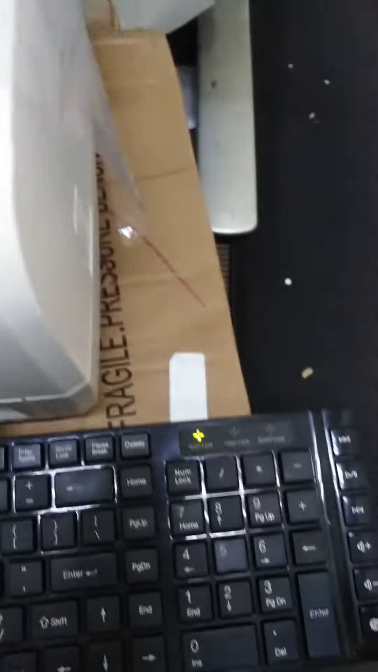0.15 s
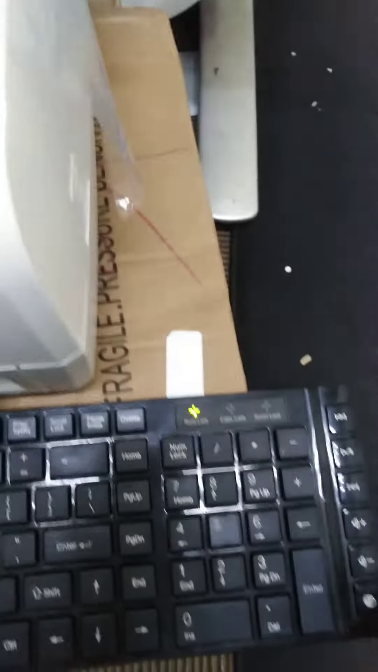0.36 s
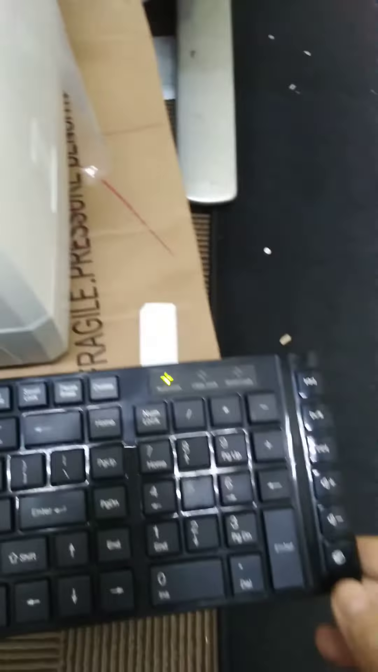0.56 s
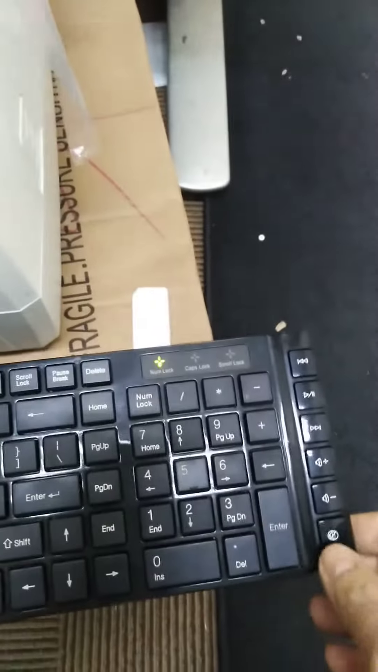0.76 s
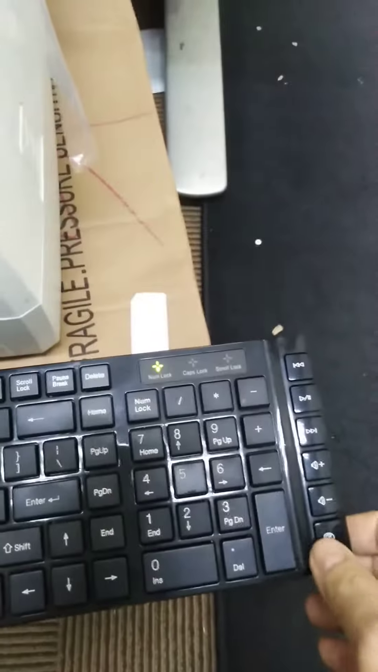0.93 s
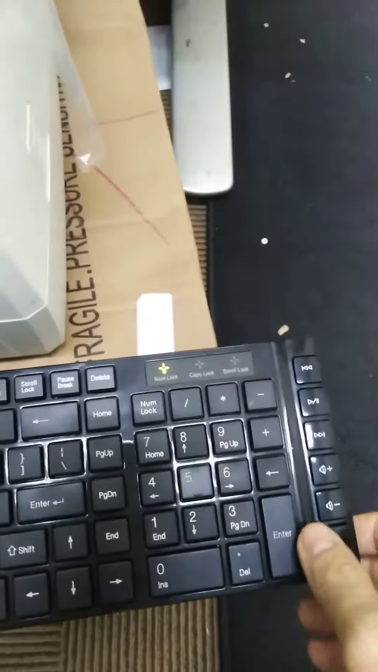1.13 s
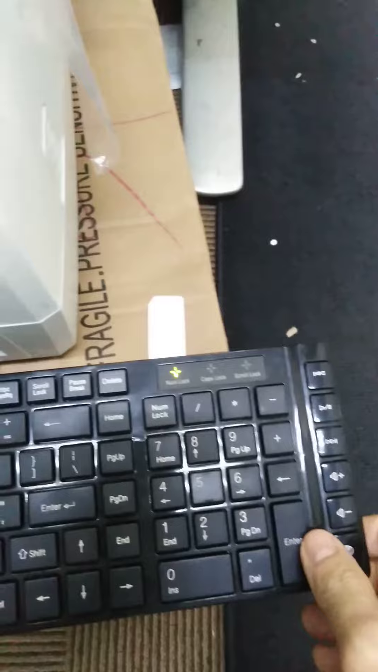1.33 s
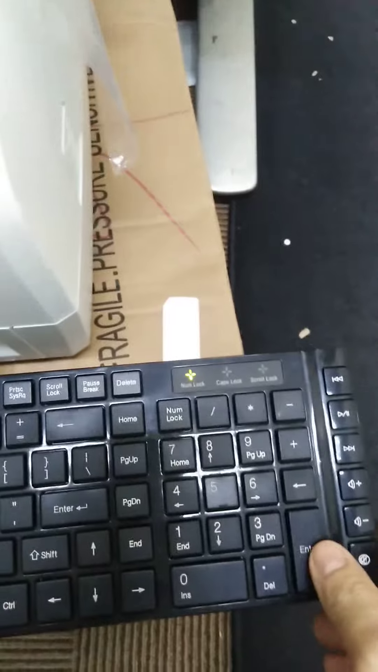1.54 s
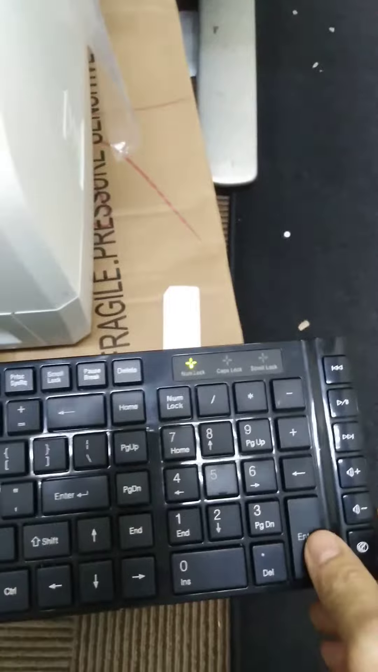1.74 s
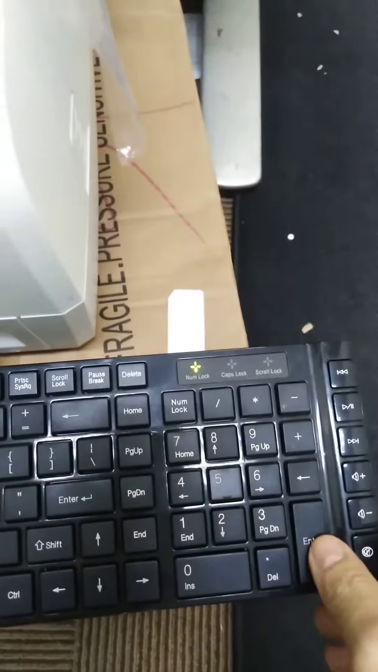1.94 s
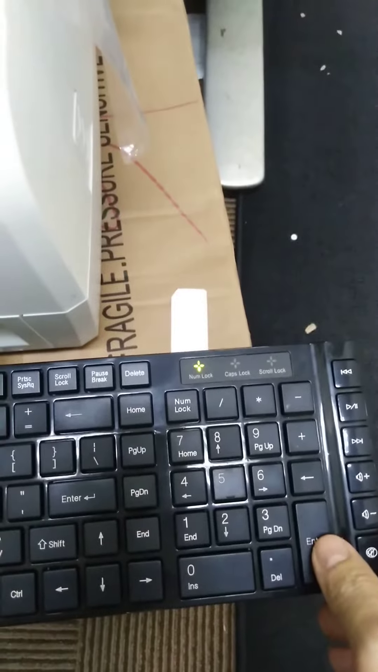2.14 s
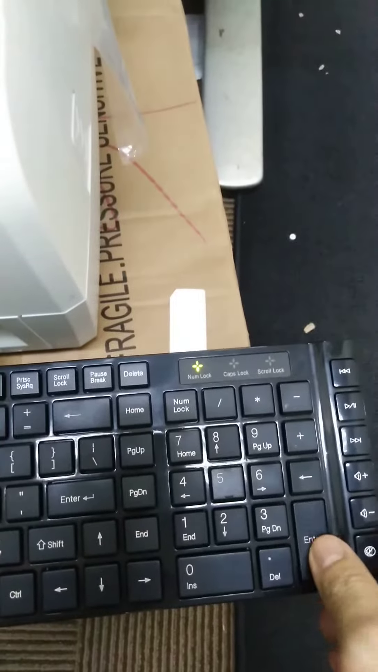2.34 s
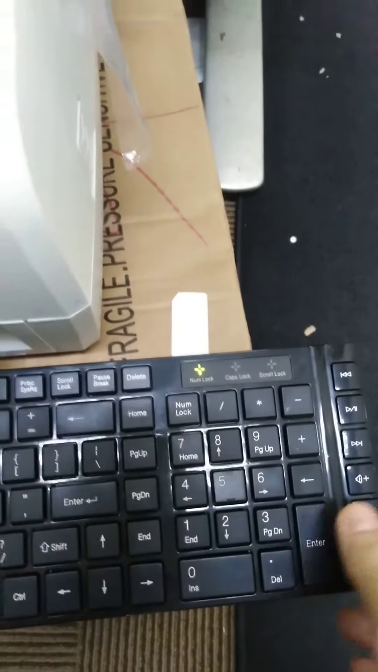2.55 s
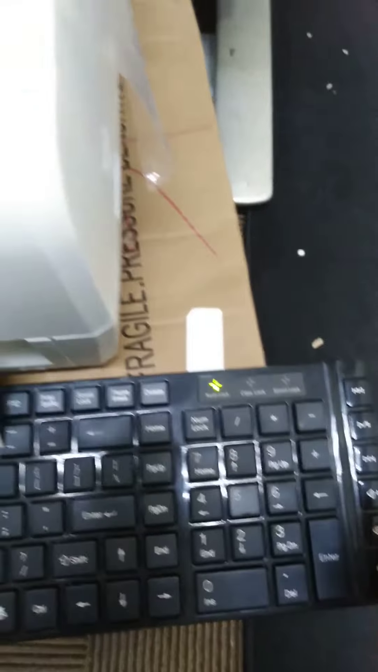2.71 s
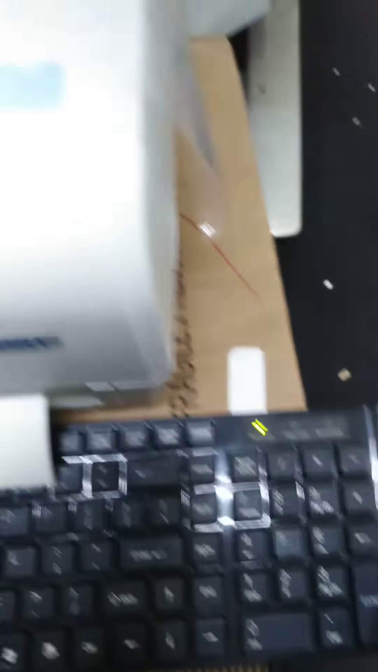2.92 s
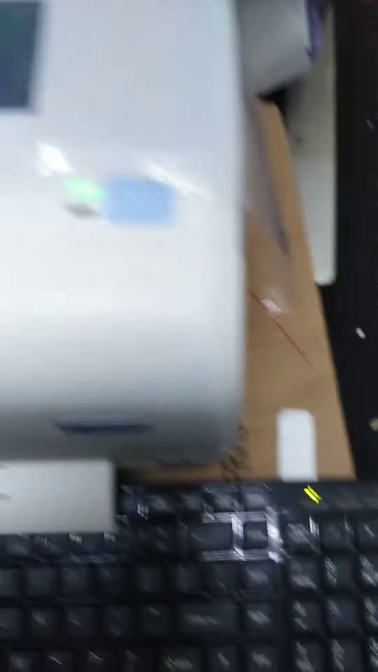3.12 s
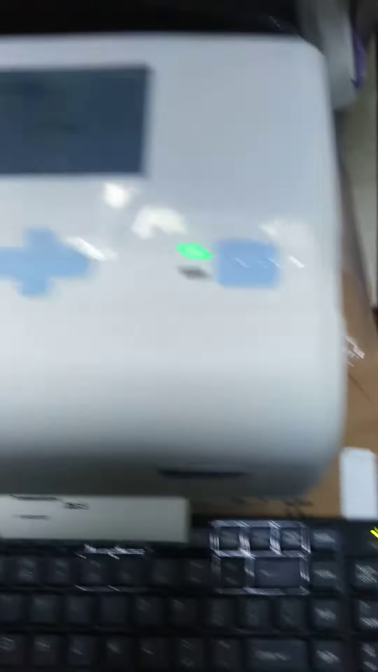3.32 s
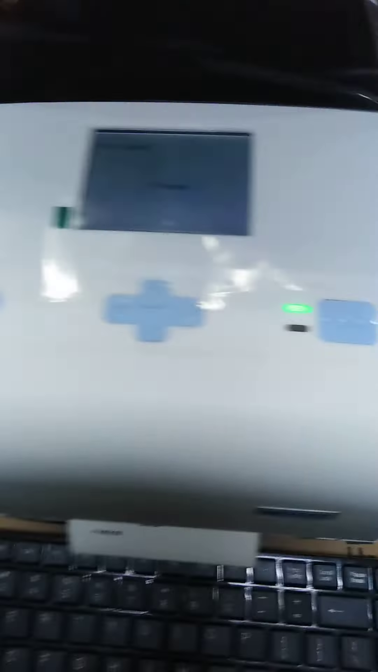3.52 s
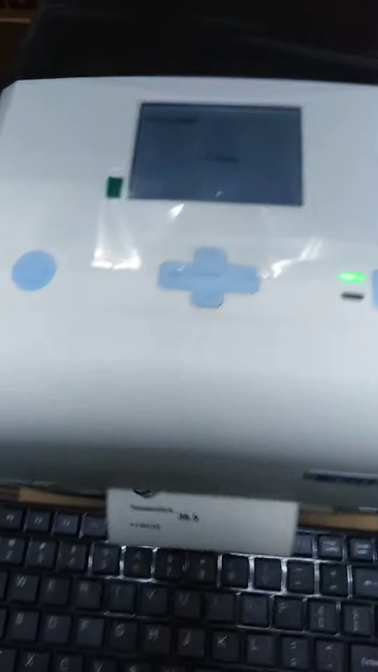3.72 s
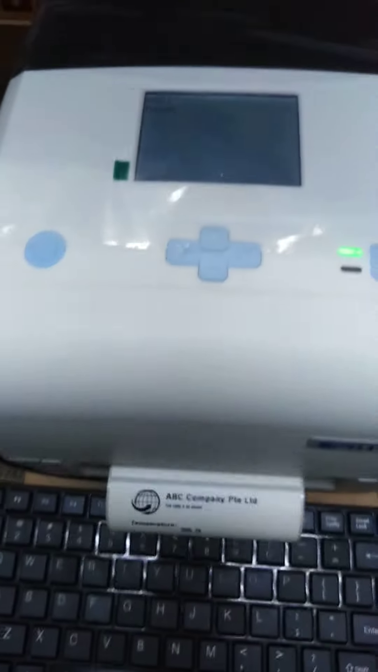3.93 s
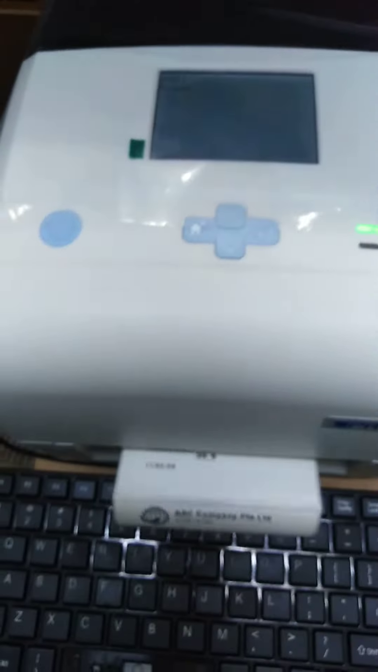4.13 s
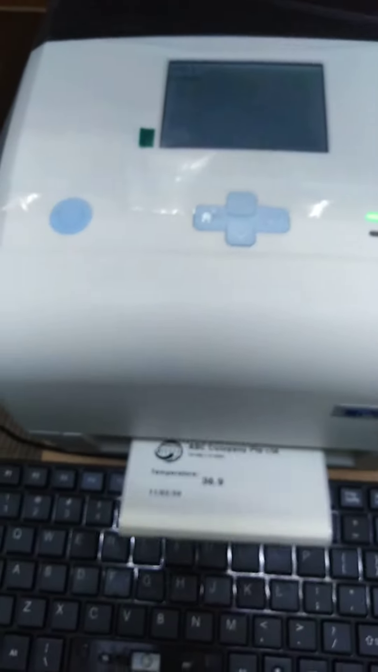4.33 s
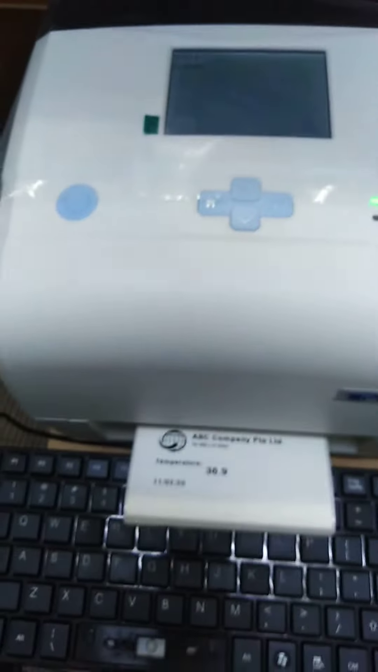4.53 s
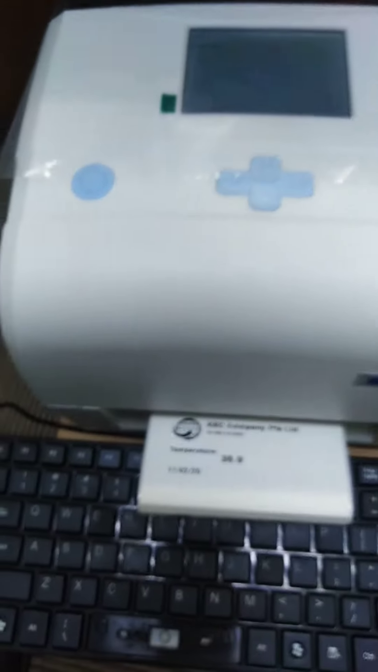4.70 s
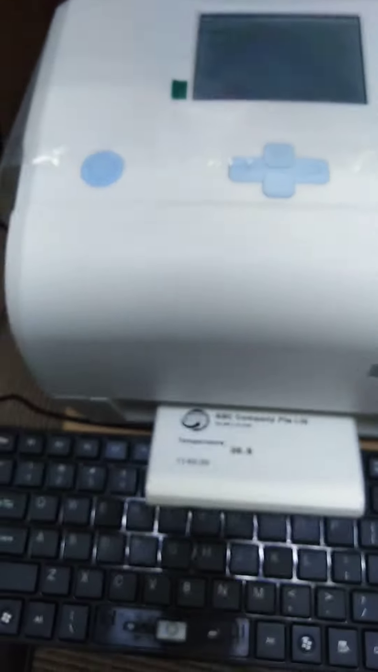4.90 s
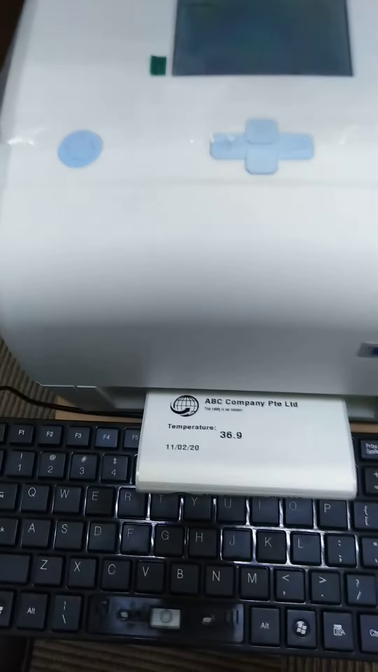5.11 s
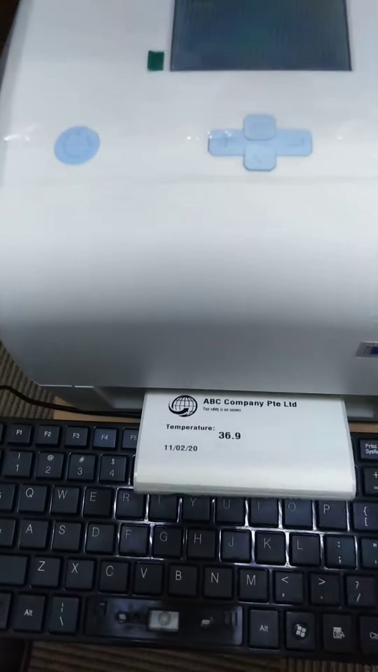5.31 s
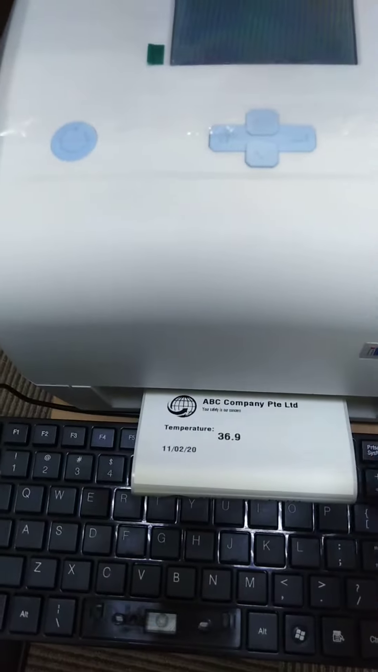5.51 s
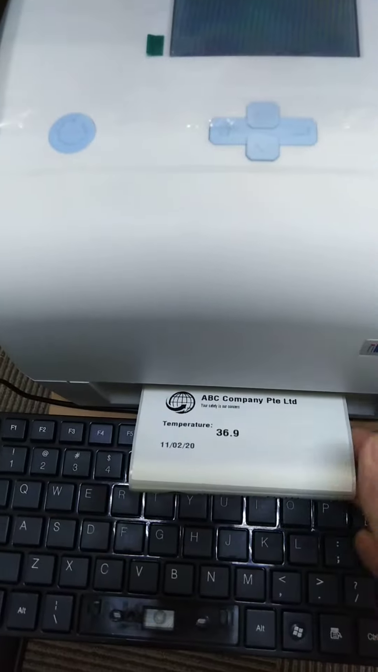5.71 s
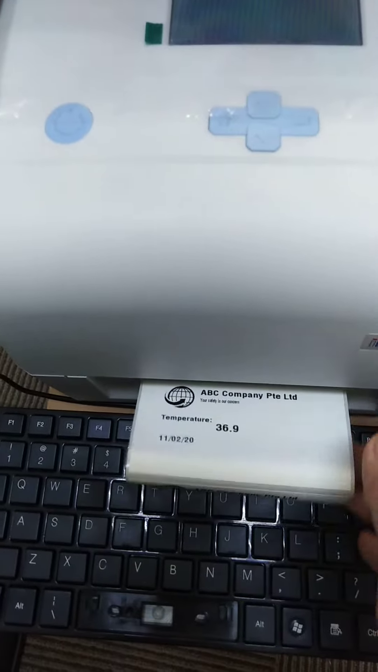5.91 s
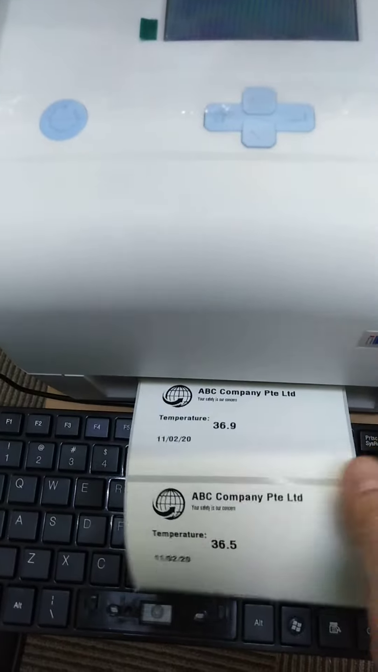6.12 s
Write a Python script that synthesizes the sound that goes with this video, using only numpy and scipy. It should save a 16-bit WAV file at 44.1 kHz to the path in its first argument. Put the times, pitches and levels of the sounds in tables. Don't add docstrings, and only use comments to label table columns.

```python
import sys
import numpy as np
from scipy import signal
from scipy.fft import rfft, irfft, next_fast_len
from scipy.io import wavfile
from scipy.ndimage import uniform_filter1d, minimum_filter1d

SR = 44100
rng = np.random.default_rng(int(sys.argv[2]) if len(sys.argv) > 2 else 0)


def transcribe(signal):
    frames = np.atleast_2d(signal).T
    limited = np.clip(frames, -1, 1)
    pcm = np.round(limited * 32767).astype(np.int16)
    wavfile.write(sys.argv[1], SR, pcm)


def voltage_ratio(decibels):
    exponent = np.asarray(decibels, float) / 20
    return 10 ** exponent


N = 271567

# (frequency [Hz], density [dB])
HUM = [(24, -36), (40, -7), (92, 0), (118, -10.5), (149, -8), (211, -18.5), (246, -13.5), (287, -22.5),
       (325, -13), (348, -19), (389, -19.5), (649, -24), (1100, -42.5), (1430, -76), (2420, -120)]
# (frequency [Hz], width [Hz], gain [dB])
FANS = [(92, 4.2, -9), (146, 10, -20), (69.5, 15, -1.5)]
# (frequency [Hz], density [dB])
HISS = [(600, -36), (900, 5.5), (1300, -3.5), (2400, -2.5), (4000, -6.5), (6500, -1.5), (9000, -7.5),
        (12500, -9.5), (14300, -45)]
# (time [s], level [dB])
HISS_DB = [(0, -70.5), (.45, -77.5), (.65, -70), (.9, -78.5), (1.1, -70.5), (1.3, -83.5), (1.9, -81.5),
           (2.3, -73.5), (2.75, -76.5), (2.95, -68), (4.68, -67.5), (4.76, -78), (4.85, -74), (5.0, -77),
           (5.7, -77), (5.75, -63)]
# (frequency [Hz], left-right correlation [-1 to 1])
SAME = [(60, 0.96), (180, 0.95), (550, 0.67), (1650, -0.68), (4970, 0.01), (15000, -0.01)]
# (time [s], share turned [0-1])
FACING = [(1.3, 0.01), (1.9, 0.38), (2.95, .4), (4.7, 0.96), (6.16, .7)]
# (facing the keys, facing the printer) [dB], [dB], [Hz]
BASS_DB = (-44.5, -48.5)
WASH_DB = (-48.5, -47.5)
EDGE_HZ = (797, 1180)
# (frequency [Hz], gain [dB])
OVERALL_TONE = [(25, -20.5), (45, -11.5), (60, 1.3), (14200, 4), (14600, -31), (16300, -36), (16600, -82)]
# (frequency [Hz], left over right [dB])
LEAN = [(60, -5), (130, 5), (290, -3), (640, 1), (1410, -1.5), (3100, -0.5), (6820, 6), (15000, -13)]
# (frequency [Hz], left leads [radians])
TURN = [(0, 1), (300, 0.2), (1000, 0.73), (2300, 1), (4800, 1.26), (9000, -2.5), (15000, -1.5)]
# (frequency [Hz], left over right [dB])
SNAP_LEAN = [(60, 22), (150, -20), (380, 14), (950, -10.5), (2380, 12), (5980, 7), (15000, -29)]
# (frequency [Hz], left leads [radians])
SNAP_TURN = [(0, 5), (2070, -2.4), (4220, 16), (8790, 7.5), (11400, 6.5), (14500, -3), (16100, 7)]

# (time [s], peak [dB], ring [Hz], t60 [s]) faint thin rings flicker about the edge of the
FLICKERS = [(.04, -66, 2230, .15), (.33, -63, 1120, 0.16), (.42, -66, 2190, 0.32), (.68, -61, 1003, 0.13),
            (1.04, -60.5, 1010, 0.13), (1.17, -65, 1320, .12), (1.85, -66, 1030, .1),
            (2.09, -66, 1300, 0.091), (2.33, -62, 1150, .08), (2.74, -62.5, 1050, .15),
            (2.91, -63, 1420, .12), (2.89, -60, 914, 0.17)]
RINGS = [(1.098, -58.5, 1830, 0.04), (1.098, -58, 2420, 0.078), (1.098, -58, 5130, 0.08),
         (1.296, -60, 1420, 0.086), (1.296, -60, 1843, 0.14), (1.296, -58.5, 2860, 0.099),
         (1.89, -62, 1275, 0.6), (2.328, -59.5, 1960, 0.13), (3.87, -38.5, 838, 0.043),
         (4.05, -40, 812, 0.1), (4.088, -32.5, 804, 0.17)]
NAIL = [(1.46, -56, 7100, .12), (1.46, -58, 9700, .1), (1.46, -60, 8300, .03), (1.461, -62, 4650, .05),
        (1.461, -66, 4100, .05), (1.46, -63, 12000, .03), (1.448, -70, 10000, .02)]
KNOCKS = [(3.872, -38, 590, .1), (3.872, -38, 930, .06), (3.828, -42, 1630, .1), (3.925, -38, 1620, .08),
          (4.03, -43, 2970, .12), (4.06, -43, 1625, .15), (4.19, -44, 900, .08), (4.2, -42, 1020, .06),
          (4.256, -41, 1440, .03), (4.185, -42, 2900, .07)]
# (time [s], peak [dB], t60 [s])
THUMPS = [
    (3.03, -37, 0.052),
    (3.056, -29.5, 0.046),
    (3.612, -32, 0.057),
    (3.684, -32.5, .04),
    (4.398, -31.5, 0.087),
    (4.464, -29.5, 0.061),
]

# (time [s], peak [dB], ring [Hz], treble [dB], t60 [s])
KEYS = [
    (2.4497, -43, 4030, -20, 0.027),
    (2.4603, -17, 7760, -2, 0.0072),
    (2.4649, -16, 6760, -8.5, 0.014),
    (2.4754, -45, 4170, -9, 0.4),
]
RATTLE = [(2.143, -38, 9000, -12, 0.0085), (2.4603, -45, 1700, -30, .03), (2.4512, -36, 3300, -30, .01),
          (2.475, -52, 3000, -30, .35), (2.1426, -47, 4000, -25, 0.0125), (2.146, -60, 8800, 0, .35),
          (2.146, -68, 4500, -22.5, .3), (2.2965, -66, 2400, 3, .01), (2.33, -43, 4200, -18, 0.014),
          (2.341, -61, 4300, -20, .3), (2.33, -52, 6300, -10, .015), (2.342, -66, 6400, -10, .3),
          (2.426, -53, 4300, -3, .012), (2.4393, -50, 4300, -5, 0.0097), (2.4512, -27, 5210, -6, 0.0097)]
PEEL = [(3.0045, -28.5, 2900, -25, 0.038), (3.0154, -28.5, 3150, -42, 0.011),
        (3.0553, -33, 1630, -30, 0.028), (3.1114, -38, 2290, -24.5, 0.023),
        (3.4959, -30.5, 3770, -27.5, 0.088), (3.5111, -31.5, 4180, -10, 0.07), (3.577, -36, 2450, 8, 0.032),
        (3.5765, -34, 5200, 6, .02), (3.6036, -30, 1950, -16, 0.073), (3.7686, -25.5, 1850, -18, 0.0083),
        (3.8214, -31, 1730, -13, 0.044), (3.873, -34, 1640, -25, 0.025), (4.2106, -30, 4900, -30, 0.012),
        (4.2175, -33, 4560, -10, 0.012), (4.2565, -25, 1760, -17, 0.013), (4.3825, -30.5, 2850, -14, 0.044),
        (4.561, -43, 2620, -29, 0.028)]
CRACKS = [(3.374, -35, 6500, -6, .012), (3.9432, -33, 13000, 6, .008), (3.9463, -22, 5470, 9, 0.012),
          (4.0243, -27, 7010, 6, 0.01), (4.051, -37, 6210, 4, 0.04), (4.1915, -36, 11000, 6, 0.0092),
          (4.2105, -28, 9000, 8, .009), (4.2168, -33, 6500, 3, .009), (4.2562, -25, 10500, 6, .011),
          (4.265, -37, 5000, 0, .01)]
SLAPS = [(3.064, -30, 1700, -30, .04), (3.108, -32, 900, -30, .04), (3.112, -32.5, 1750, -30, .03),
         (3.21, -36.5, 1800, -25, 0.065), (3.27, -36, 1650, -25, 0.071), (3.35, -41, 1900, -25, .06),
         (3.45, -41.5, 1600, -25, .05), (3.603, -33.5, 4700, -10, 0.022), (3.627, -31, 2350, -15, .03),
         (3.644, -36, 2800, -20, .02), (3.678, -32, 2850, -25, 0.028), (3.705, -43, 2500, -20, .03),
         (3.768, -38, 4900, -12, .01), (3.872, -37, 4200, -1, 0.028), (3.93, -35, 1650, -20, .05),
         (4.0243, -35, 3000, -15, .01), (4.2563, -30, 5000, -10, 0.012), (4.583, -39, 4280, -18, .04),
         (4.39, -35, 2850, -25, .04), (4.462, -38, 2750, -25, .04), (3.015, -33, 4000, -15, .02)]
GRIP = [(5.7364, -30.5, 1620, -25, 0.021), (5.7994, -50, 6250, -20, 0.015), (5.88, -52, 3000, -8, .02),
        (5.71, -55, 3700, -20, .02), (5.788, -52, 1700, -25, .012), (5.811, -49, 1750, -25, .012),
        (5.912, -53, 1700, -25, .02), (5.942, -42, 1600, -18.5, 0.015), (5.9539, -38, 1810, -4, 0.032),
        (6.0314, -34, 5780, -14, 0.017)]

# (time [s], level [dB])
HANDLING = [(5.7, -80), (5.72, -63), (5.735, -55), (5.76, -61), (5.8, -64), (5.83, -67), (5.885, -67),
            (5.898, -72), (5.91, -80)]
# (time [s], level [dB])
TEAR = [(5.9, -80), (5.913, -66), (5.935, -62), (5.96, -50), (6.01, -35.5), (6.04, -48), (6.08, -70),
        (6.158, -54.5)]
# (frequency [Hz], density [dB])
TEAR_COLOUR = [(600, -33), (1150, -16), (1800, -2.5), (2300, -9.5), (3000, -6.5), (5800, -15), (8000, -22),
               (14000, -21.5)]
# (time [s], peak [dB])
SNAPS = [
    (6.0073, -0.5),
    (6.0088, -8),
    (6.012, -23),
    (6.019, -21),
]
# (frequency [Hz], width [Hz], gain [dB])
SNAP_RING = [(1246, 180, 0), (1750, 155, 1.5), (4830, 730, -2.5), (5640, 240, -2), (6410, 510, -0.5),
             (8220, 750, 2), (10300, 310, -6.5), (10700, 254, -5.5), (12960, 150, -21)]

# (frequency [Hz], width [Hz], gain [dB])
CASE = [(241, 26, 10.5), (302, 24, -15), (523, 70, 1.5), (900, 30, 1), (1650, 72, -6.5), (2084, 47, -18),
        (2900, 77, -11.5), (3530, 67, -7), (4270, 360, -4), (4645, 100, -20)]
# (frequency [Hz], width [Hz], gain [dB])
FRAME = [(224, 48, 8), (321, 37, -1.5), (202, 50, -6)]
# (frequency [Hz], width [Hz], gain [dB])
GUIDE = [(6240, 490, 7.5), (6650, 280, 8), (9460, 220, 0), (11920, 200, 7)]
# (frequency [Hz], density [dB])
GEARS = [(300, -23), (450, -13.5), (900, -5), (1700, -6), (2300, -8), (3000, -5), (4000, -13),
         (5500, -18.5), (7000, -15), (9000, -25.5)]
# (frequency [Hz], density [dB])
PAPER = [(3500, -16), (5000, 1.5), (6300, -13), (7300, -10), (8200, -8.5), (9500, -3.5), (11000, -7),
         (13700, -17.5), (14500, -12)]
# (level at backing speed [dB], slope [dB per octave of speed])
RUNNING = [
    (-50.5, 0.44),
    (-52.5, 4),
    (-48.5, 7.5),
]
# (time [s], gear level [dB], frame level [dB], time to rise 20 dB [s], time to fall 20 dB [s])
JOLTS = [(3.012, -31.5, -35, 0.01, 0.032), (3.58, -40, -50, .004, .04), (3.062, -35, -45, .012, .05),
         (3.508, -38.5, -39, 0.0373, 0.05), (3.621, -40.5, -35.5, 0.05, 0.09),
         (3.836, -49.5, -42, 0.02, 0.24), (4.206, -54.5, -39.5, 0.12, 0.28), (4.39, -52, -40, 0.01, 0.09),
         (4.472, -53, -42, 0.005, 0.05), (4.585, -50, -44, 0.02, 0.0555)]

BACK_HZ, FEED_HZ = 2343.3, 4874.8
# (start [s], ramp from [s], stop [s], braking [s], cruise [Hz])
MOVES = [
    (3.004, 3.016, 3.502, .0005, BACK_HZ),
    (3.578, 3.586, 4.376, .019, FEED_HZ),
]
# (time [s], level [dB])
LOAD = [
    [(3.018, -53), (3.04, -38.5), (3.051, -46), (3.058, -37.5), (3.085, -36), (3.1, -35.5), (3.11, -35.5),
     (3.494, -34), (3.502, -49)],
    [(3.578, -42), (3.592, -36), (3.615, -37.5), (3.655, -37.5), (3.664, -44), (3.696, -49), (4.1, -47),
     (4.376, -49.5), (4.39, -42)],
]
# (start [s], length [s], level [dB], first rate [Hz], rate at full torque [Hz])
NUDGES = [
    (4.392, 0.058, -36, 960, 900),
    (4.446, 0.04, -33, 837, 900),
    (4.558, 0.041, -38, 855, 849),
]
ORDERS = [
    [1 / 8, 1 / 4, 3 / 8, 2 / 3, 5 / 6, 1, 5 / 4, 2, 3, 4, 1 / 6, 1 / 2, 7 / 6, 5 / 3, 9 / 4, 47 / 16, 49 /
     16, 63 / 16],
    [1 / 16, 1 / 8, 1 / 6, 1 / 4, 1 / 3, 1 / 2, 2 / 3, 15 / 16, 1, 5 / 4, 2, 3, 4, 5, 2 / 25, 5 / 8, 13 /
     16, 7 / 4, 31 / 16],
    [1 / 4, 1, 2, 3, 4, 5],
]
# (at low speed [dB], at cruise [dB])
ORDERS_DB = [
    [(-41.5, -19.5), (-9, -9), (-29.5, -24), (-26.5, -28.5), (-25, -21), (0.5, 1), (-16, -30), (-3.5, -13),
     (-6, -28), (-26, -30.5), (-30, -24), (-29, -25), (-35, -31), (-40, -32.5), (-35, -29), (-45, -33),
     (-45, -39), (-50, -38)],
    [(-43.5, -10), (-37.5, -12), (-26.5, -17), (-14, 4.5), (-44, -16), (-19, -17.5), (-30, -15), (-23, -12),
     (1, 3), (-51, -16), (-9, -18), (-8, -52), (-24, -51.5), (-28, -48.5), (-40, -11.5), (-40, -19),
     (-40, -19), (-45, -26), (-45, -21)],
    [(-13.5, -12), (1.5, -1), (-11, -18), (-8.5, -16), (-16, -18), (-14, -17)],
]
# (frequency [Hz], gain [dB])
RADIATE = [(700, 0), (1000, 0.4), (1600, 1.5), (2200, -1.5), (2900, 3), (3500, 1.1), (4300, -7),
           (6000, -13)]
# (time [s], gain [dB])
TENSION = [(3.7, 0), (3.75, -1), (3.8, 2), (3.86, -3), (3.95, 1), (4.06, -2), (4.14, 3), (4.24, -1),
           (4.37, -4)]
# (start [s], stop [s], level [dB], frequency [Hz])
HOLDS = [
    (4.6, 4.666, -57, 820),
    (4.697, 5.02, -80.5, 2420),
]

START_HZ, KNEE_HZ = 830.5, 2890
RAMP, EASED_RAMP, BRAKE = 14.0, 4.9, 58
NUDGE_RISE_S, SAG_HZ_PER_S = .013, 2400
NUDGE_FROM_DB, NUDGE_SAG_DB, NUDGE_END_DB = -9.5, -5.5, -14
PAPER_TOP_HZ, COAST_S, JOLT_PAPER_DB = 2900, .007, -14
THUMP_HZ, RING_TREBLE_DB = 228.2, -40


def evened(x):
    return x / np.sqrt(np.mean(x ** 2) + 1e-20)


def read(points, hz):
    f, value = np.transpose(points)
    return np.interp(np.log(hz + 1), np.log(f + 1), value)


def colour(x, points):
    n = next_fast_len(x.shape[-1])
    gain = voltage_ratio(read(points, np.fft.rfftfreq(n, 1 / SR)))
    return irfft(rfft(x, n) * gain, n)[..., :x.shape[-1]]


def bandpass(order, edges, kind):
    return signal.butter(N=order, Wn=edges, btype=kind, fs=SR, output="sos")


def resonate(x, modes):
    out = np.zeros(len(x))
    for k, (hz, width, db) in enumerate(modes):
        r = np.exp(-np.pi * max(width, 5) / SR)
        w = 2 * np.pi * hz / SR
        zeros = [(1 - r * r) / 2, 0, (r * r - 1) / 2]
        poles = [1, -2 * r * np.cos(w), r * r]
        out += (-1) ** k * voltage_ratio(db) * signal.lfilter(zeros, poles, x + 1e-20)
    return out


def level(tables, column):
    t, gain = np.arange(0, N + 32, 32) / SR, 0
    for rows in tables:
        rows = np.array(rows)
        gain = gain + voltage_ratio(np.interp(t, rows[:, 0], rows[:, column], -150, -150))
    return np.interp(np.arange(N) / SR, t, gain)


def wobble(samples):
    smooth = uniform_filter1d(rng.standard_normal(N), int(samples))
    return evened(uniform_filter1d(smooth, int(samples)))


def shifted(curve):
    return np.roll(curve, rng.integers(N))


def facing(ends, t):
    return ends[0] + (ends[1] - ends[0]) * np.interp(t, *np.transpose(FACING))


def wander(t):
    return voltage_ratio(0.8 * np.interp(t, np.arange(N) / SR, wobble(1500)))


def ports(x, lean, turn):
    n = next_fast_len(N)
    hz = np.fft.rfftfreq(n, 1 / SR)
    half = voltage_ratio(read(lean, hz) / 2) * np.exp(.5j * np.interp(hz, *np.transpose(turn)))
    return irfft(rfft(x, n) * np.array([half, 1 / half]), n)[:, :N]


def air(points, patchy_db, streak, same):
    frames, hz = N // 256 + 5, np.fft.rfftfreq(1024, 1 / SR)
    a, b, c, d, patches = rng.standard_normal((frames, 513, 5)).T
    patches = uniform_filter1d(patches, size=2, axis=0)
    patches = evened(uniform_filter1d(patches, int(streak), axis=1))
    same, left = np.clip(same, -1, 1), a + 1j * b
    right = same * left + np.sqrt(1 - same ** 2) * (c + 1j * d)
    z = np.array([left, right]) * voltage_ratio(read(points, hz)[:, None] + patchy_db * patches)
    return evened(signal.istft(z, nperseg=1024, noverlap=768)[1][:, :N])


def hum():
    t = np.arange(N) / SR
    low = air(HUM, patchy_db=0.5, streak=11, same=read(SAME, np.fft.rfftfreq(1024, 1 / SR))[:, None])
    hz, s, z = signal.stft(low, SR, nperseg=512)
    above_edge = hz[:, None] > facing(EDGE_HZ, s) * wander(s)
    low = signal.istft(z * voltage_ratio(-17 * above_edge), SR, nperseg=512)[1][:, :N]
    bass = signal.sosfiltfilt(bandpass(3, 140, "low"), low)
    high = air(HISS, patchy_db=7.5, streak=17, same=0.26) * level([HISS_DB], column=1)
    bass = evened(bass) + 0.47 * evened(resonate(rng.standard_normal(N), FANS))
    wash = evened(low - bass) * voltage_ratio(facing(WASH_DB, t))
    return evened(bass) * voltage_ratio(facing(BASS_DB, t)) + wash + high


def office(x, t60):
    n = SR // 2
    sparse = rng.choice([-1., 1.], (2, n)) * (rng.random((2, n)) < .05)
    taps = sparse * voltage_ratio(-60 * np.arange(n) / SR / t60)
    taps[:, :130] = 0
    return signal.fftconvolve(x, taps / np.linalg.norm(taps[0]), axes=1)[:, :N]


def ticks(rows, ring_db, sharpness, pan_db, contact=6.5, mid_db=0.):
    out, t = np.zeros((2, N + 6000)), np.arange(6000) / SR
    mid, top = bandpass(2, [1300, 6000], "band"), bandpass(2, 6000, "high")
    pan = voltage_ratio([[pan_db / 2], [-pan_db / 2]])
    for (s, db, hz, treble_db, t60), noise in zip(rows, rng.standard_normal((len(rows), 2, 6000))):
        decay = voltage_ratio(-60 * t / max(t60, .002)) * np.minimum(t / (0.06 * t60), 1)
        burst = (noise[0] + 1.8 * noise) * decay
        burst[:, 4] += contact
        ring = resonate(burst[0], [(hz, hz / sharpness, ring_db)])
        ring = resonate(ring, [(hz, 3.0 * hz / sharpness, 0)])
        dull_db = mid_db - 9.0 * max(np.log2(hz / 2600), 0)
        mid_crack = voltage_ratio(dull_db) * signal.sosfilt(mid, burst)
        sound = ring + mid_crack + voltage_ratio(treble_db + 3) * signal.sosfilt(top, burst)
        out[:, round(s * SR):][:, :6000] += voltage_ratio(db) * sound / abs(sound.mean(0)).max() * pan
    return out[:, :N]


def key_ticks():
    nail = [(s, db, hz, RING_TREBLE_DB + 30, t60) for s, db, hz, t60 in NAIL]
    out = voltage_ratio(-4.0) * ticks(KEYS, ring_db=-0.5, sharpness=2.4, pan_db=-2.5, mid_db=3.)
    out += ticks(nail, ring_db=30, sharpness=15, pan_db=-3.0)
    return out + voltage_ratio(-2.5) * ticks(RATTLE, ring_db=21, sharpness=6.5, pan_db=-3.0, mid_db=-5.)


def body_rings():
    rings = [(s, db, hz, RING_TREBLE_DB, t60) for s, db, hz, t60 in RINGS + FLICKERS + KNOCKS]
    thumps = [(s, db, THUMP_HZ, RING_TREBLE_DB - 18, t60) for s, db, t60 in THUMPS]
    out = voltage_ratio(-3.5) * ticks(rings, ring_db=48.5, sharpness=32, pan_db=-3.5, contact=16.0)
    return out + voltage_ratio(-2.5) * ticks(thumps, ring_db=39.5, sharpness=14.2, pan_db=0.5)


def label_ticks():
    web = ticks(PEEL + CRACKS + SLAPS, ring_db=18.5, sharpness=7.1, pan_db=4.0)
    return web + ticks(GRIP, ring_db=14, sharpness=5.5, pan_db=4.0, mid_db=2.)


def tearing():
    size = voltage_ratio(2.5 * np.minimum(rng.exponential(1, (2, N)), 4))
    breaks = size * (rng.random((2, N)) < 9000 / SR) * rng.choice([-1, 1], (2, N))
    crackle = evened(colour(breaks + 0.96 * breaks[::-1], TEAR_COLOUR))
    crackle = crackle * level([HANDLING, TEAR], column=1) * voltage_ratio(1.5 * wobble(220))
    blow, snap = np.zeros(600), np.zeros(N)
    blow[:5] = [0.42, 0.85, -0.71, -0.14, -1.15]
    modes = [(hz, 4.8 * width, db + 20 * np.log10(4000 / width)) for hz, width, db in SNAP_RING]
    ring = 2.1 * blow + resonate(blow, modes)
    for s, db in SNAPS:
        snap[round(s * SR):][:600] += voltage_ratio(db) * ring / abs(ring).max()
    return crackle + ports(snap, SNAP_LEAN, SNAP_TURN)


def effort(speed):
    t, r = np.arange(N) / SR, np.exp(-1 / (COAST_S * SR))
    speeds = np.array([speed, speed, np.minimum(speed, PAPER_TOP_HZ)])
    db, slope_db = np.transpose(RUNNING)[..., None]
    driven = (speed > 0) * voltage_ratio(db + slope_db * np.log2(speeds / BACK_HZ + 1e-9))
    gain = signal.lfilter([1 - r], [1, -r], driven)
    for s, gear_db, frame_db, rise, fall in JOLTS:
        swell = voltage_ratio(-20 * np.maximum((s - t) / rise, (t - s) / fall))
        gain += voltage_ratio([[gear_db], [frame_db], [gear_db + JOLT_PAPER_DB]]) * swell
    return gain


def shake(cycle, speed):
    teeth = rng.standard_normal(N) * voltage_ratio(1.0 * cycle + 2.1 * wobble(160))
    panels = sum(resonate(teeth, [mode]) * voltage_ratio(4.2 * wobble(580)) for mode in CASE[2:])
    gears = colour(teeth + 1.7 * panels, GEARS)
    gears /= np.std(signal.sosfilt(bandpass(2, [2600, 4400], "band"), gears))
    frame = evened(resonate(rng.standard_normal(N), FRAME))
    scrape = rng.standard_normal(N) * voltage_ratio(2.0 * cycle + 1.2 * wobble(60))
    hiss = evened(colour(scrape + resonate(scrape, GUIDE), PAPER))
    return (np.array([gears, frame, hiss]) * effort(speed) * voltage_ratio([[-3.5], [-5], [-2.5]])).sum(axis=0)


def holding():
    t, waver, out = np.arange(N) / SR, voltage_ratio(3.5 * wobble(250)), np.zeros(N)
    for start, stop, db, hz in HOLDS:
        gate = uniform_filter1d(1. * (t > start) * (t < stop), size=300)
        out += np.sqrt(2) * voltage_ratio(db) * waver * np.sin(2 * np.pi * hz * t) * gate
    return out


def squared_period(hz):
    return (1000 / hz) ** 2


def plan():
    moves = []
    for (start, ramp, stop, braking, hz), load, orders, orders_db in zip(MOVES, LOAD, ORDERS, ORDERS_DB):
        knee_hz = min(KNEE_HZ, hz)
        knee = ramp + (squared_period(START_HZ) - squared_period(knee_hz)) / RAMP
        top = knee + (squared_period(knee_hz) - squared_period(hz)) / EASED_RAMP
        slowed_hz = hz / np.sqrt(1 + BRAKE * abs(braking) / squared_period(hz))
        times = [start, ramp, knee, top, stop, stop + abs(braking)]
        rates = [START_HZ, START_HZ, knee_hz, hz, hz, slowed_hz]
        moves.append((times, rates, load, orders, orders_db))
    for start, length, db, first_hz, hz in NUDGES:
        full, end = start + NUDGE_RISE_S, start + length
        sagged = min(full + abs(hz - START_HZ) / SAG_HZ_PER_S, end)
        sagged_hz = hz - SAG_HZ_PER_S * (sagged - full)
        load = [(start, db + NUDGE_FROM_DB), (full, db),
                (end - NUDGE_RISE_S / 2, db + NUDGE_SAG_DB), (end, db + NUDGE_END_DB)]
        rates = [first_hz, hz, sagged_hz, sagged_hz]
        moves.append(([start, full, sagged, end], rates, load, ORDERS[-1], ORDERS_DB[-1]))
    return moves


def stepper():
    t, out, cycle, speed = np.arange(N) / SR, np.zeros(N), np.zeros(N), np.zeros(N)
    flutter_db, judder_db = 4.5 * wobble(1300), 3.88 * wobble(130)
    pull_db = np.interp(t, *np.transpose(TENSION), 0, 0) + .35 * judder_db
    for s, hz, load, orders, orders_db in plan():
        hz = np.array(hz, float)
        on = (t > s[0]) & (t < s[-1])
        rate = np.interp(t[on], s, hz ** -2.) ** -.5
        cruise = uniform_filter1d(1. * (rate > .98 * max(hz.max(), BACK_HZ)), size=300)
        unsteady = shifted(judder_db)[on] * (1 - cruise)
        steps = np.cumsum(rate * (1 + .002 * unsteady)) / SR
        tone = 0
        for k, (slow_db, fast_db) in zip(orders, orders_db):
            case_db = read(RADIATE, k * rate) + .55 * shifted(judder_db)[on]
            flutter_share = 1 if k % 1 > 0 and k != 1 / 4 else .22
            order_db = slow_db + (fast_db - slow_db) * cruise + case_db * (1 - cruise)
            order_db = order_db + shifted(flutter_db)[on] * flutter_share + (k > .9) * pull_db[on]
            tone = tone + voltage_ratio(order_db) * np.sin(2 * np.pi * (k * steps + rng.random()))
        changing = np.minimum(abs(np.gradient(np.log(rate))) * SR / 6, 1)
        torque = voltage_ratio(np.interp(t[on], *np.transpose(load)) + .3 * judder_db[on] * changing)
        out[on] += np.sqrt(2) * tone * torque * signal.windows.tukey(on.sum(), 200 / on.sum())
        cycle[on], speed[on] = np.cos(2 * np.pi * steps / 4), rate
    return voltage_ratio(-1.5) * out + voltage_ratio(-8.0) * resonate(out, CASE), cycle, speed


def scene():
    tone, cycle, speed = stepper()
    near = ports(shake(cycle, speed), LEAN, TURN)
    near += key_ticks() + body_rings() + label_ticks() + tearing()
    motor = ports(tone + holding(), LEAN, TURN)
    reflections = voltage_ratio(-13.5) * office(near + voltage_ratio(-11.5) * motor, t60=0.35)
    return motor + near + reflections + hum()


def roll_off(x):
    return signal.sosfilt(signal.butter(12, 16510, fs=SR, output="sos"), x)


def record(dry):
    hz, t, z = signal.stft(colour(dry, OVERALL_TONE), SR, nperseg=512, noverlap=384)
    power = uniform_filter1d((abs(z) ** 2).mean(0), size=2, axis=0)
    power_db = 10 * np.log10(abs(uniform_filter1d(power, size=7, axis=1)) + 1e-16)
    quiet_db = np.percentile(power_db, q=30, axis=1, keepdims=True)
    held_db = -minimum_filter1d(-power_db, size=31, axis=1, origin=15)
    fall = 160 * t
    over_db = np.maximum.accumulate(np.minimum(held_db - quiet_db, 24) + fall, axis=1) - fall
    shut = 1 / (5.5 + np.exp((over_db - 12.5) / 4.1))
    treble = 1 / (1 + (facing(EDGE_HZ, t) * wander(t) / (hz[:, None] + 1)) ** 24)
    clean = signal.istft(z * voltage_ratio(-32 * shut * treble), SR, nperseg=512, noverlap=384)[1][:, :N]
    return roll_off(np.clip(clean, -1, 1))


dry = scene()
out = record(dry)
transcribe(out)
```